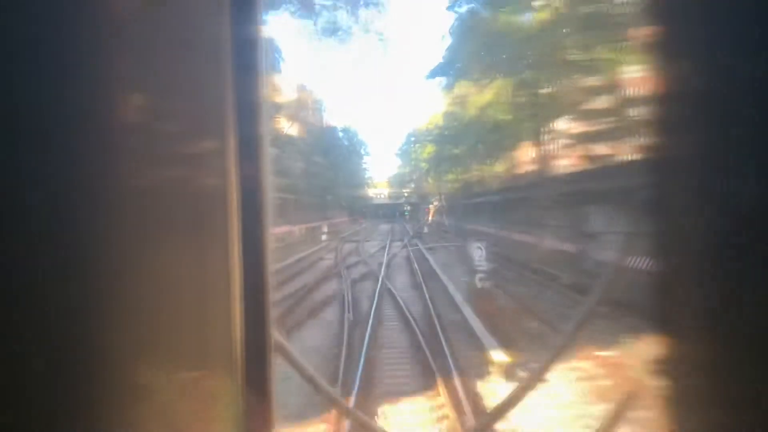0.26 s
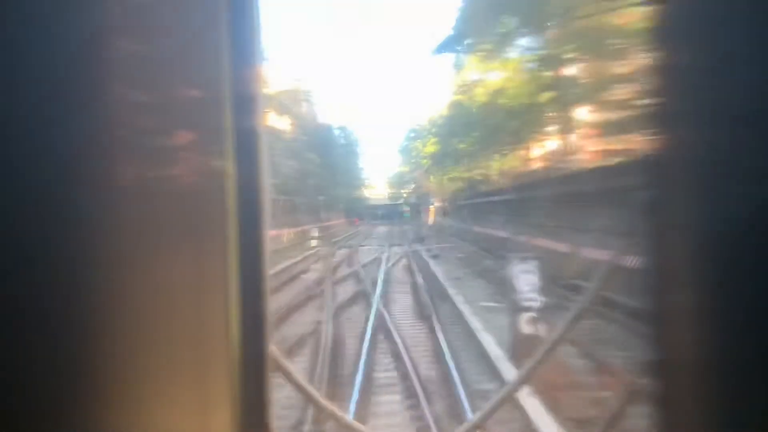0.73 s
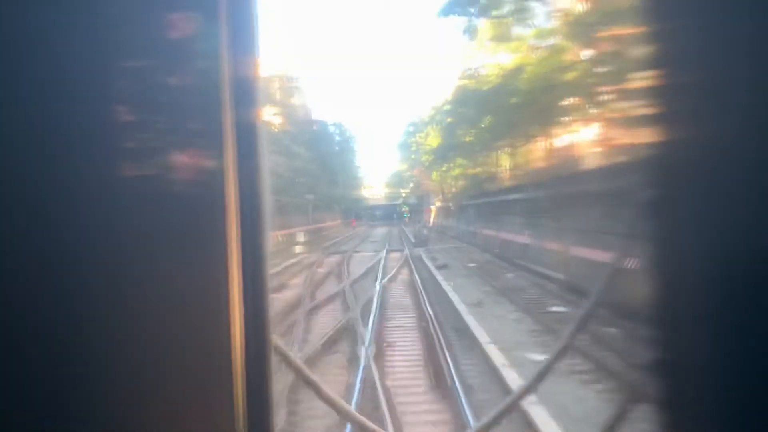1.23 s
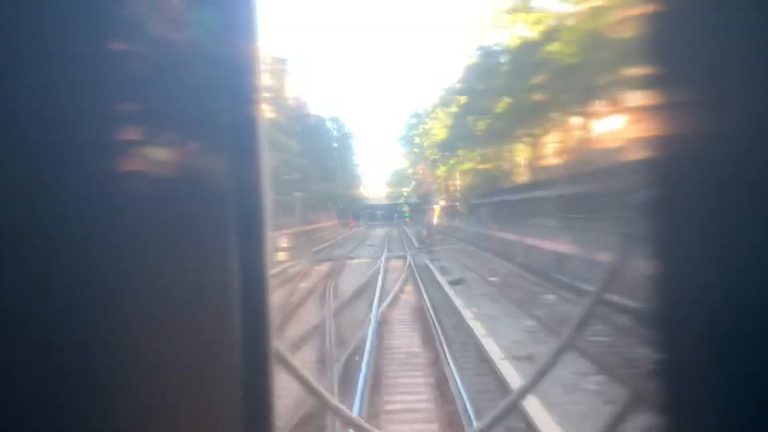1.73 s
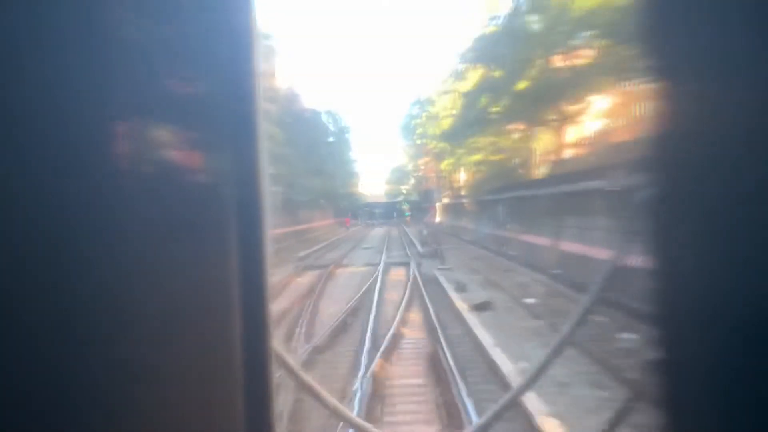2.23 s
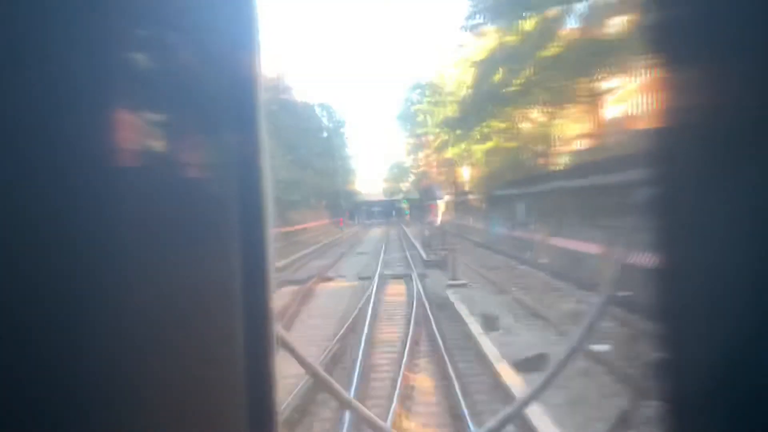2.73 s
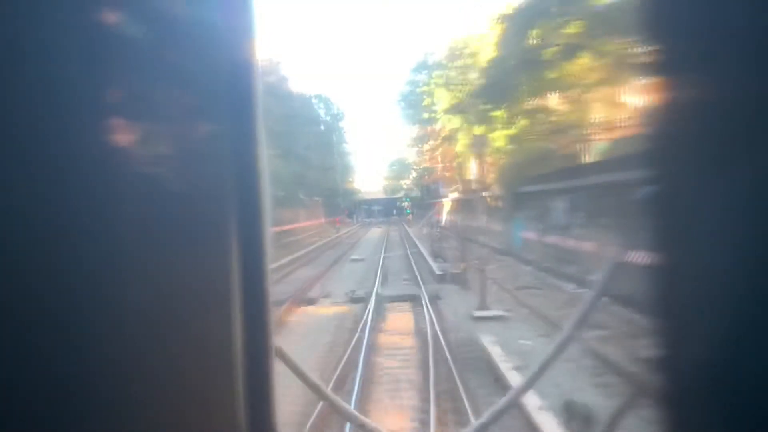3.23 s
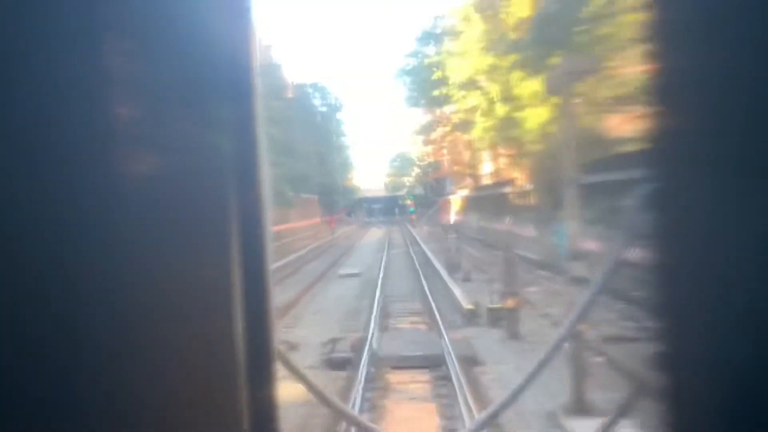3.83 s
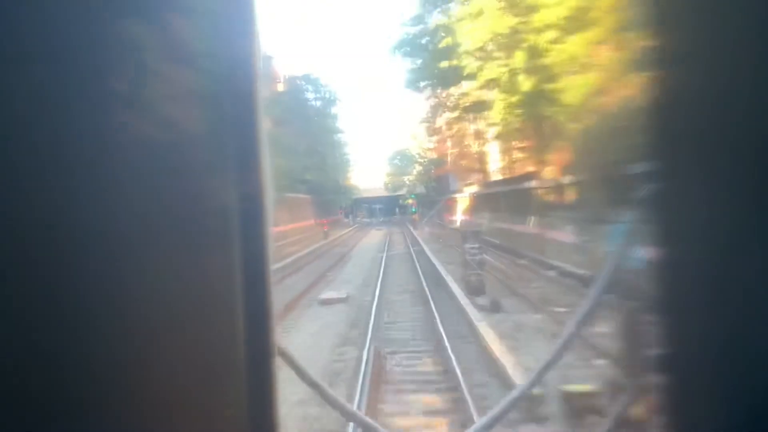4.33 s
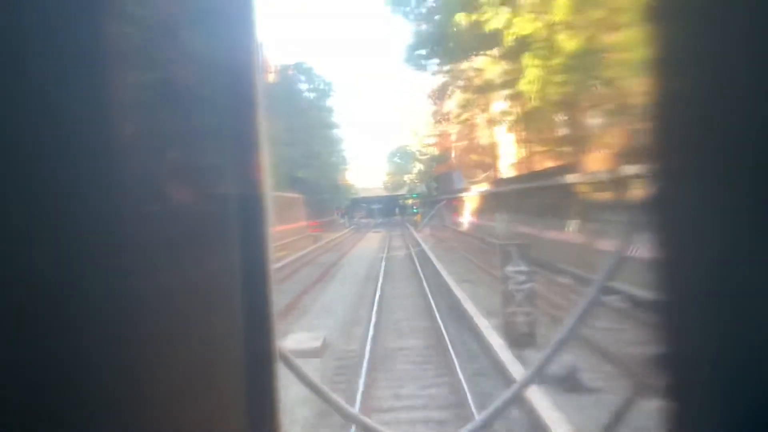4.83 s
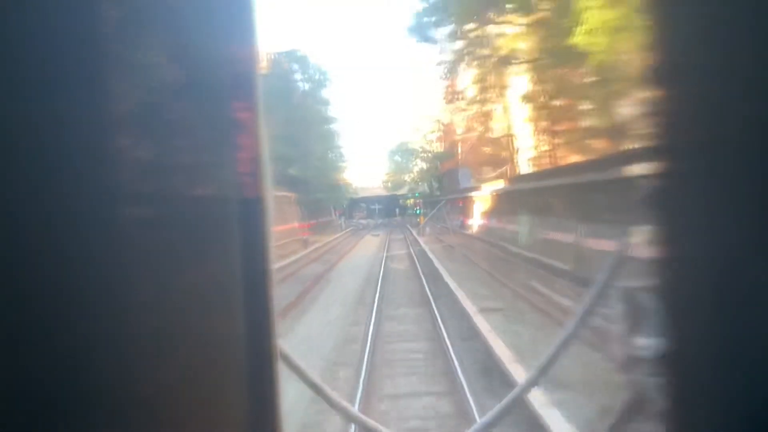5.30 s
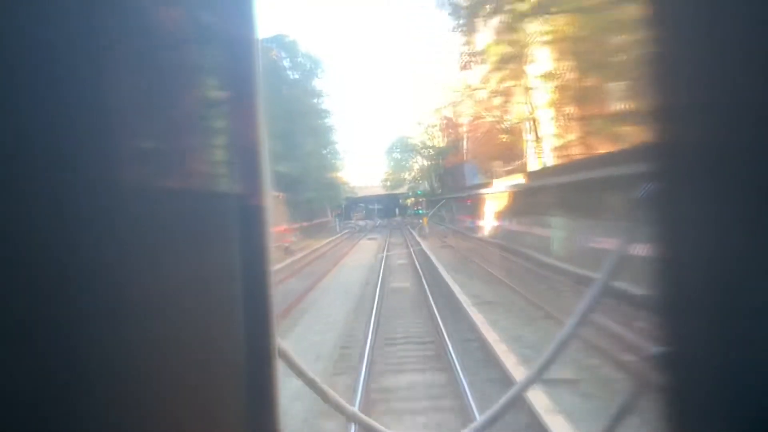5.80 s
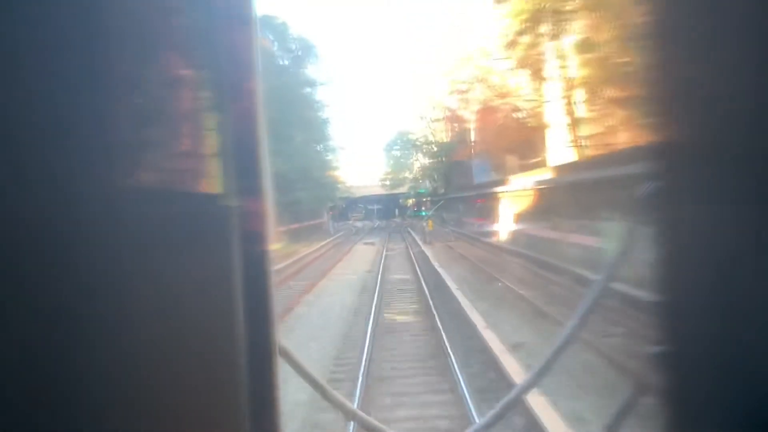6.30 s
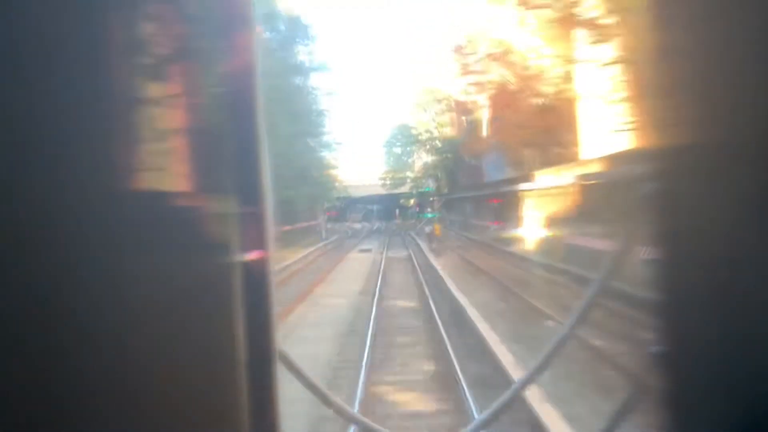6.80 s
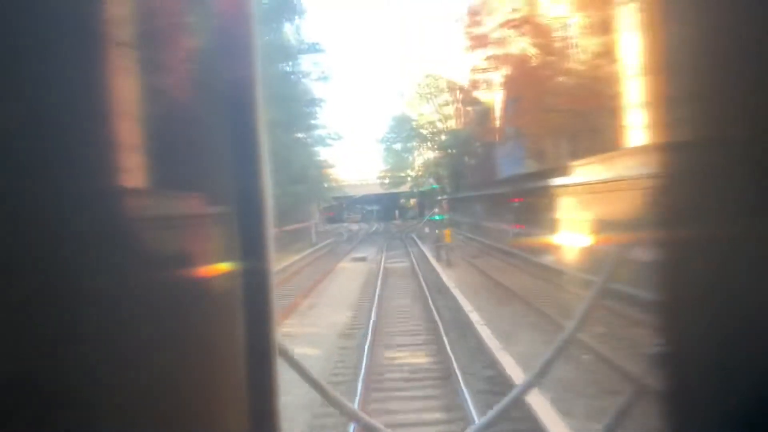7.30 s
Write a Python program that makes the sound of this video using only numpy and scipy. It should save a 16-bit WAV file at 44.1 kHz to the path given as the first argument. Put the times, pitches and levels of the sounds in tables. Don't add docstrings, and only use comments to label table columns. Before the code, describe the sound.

A train runs at speed on open track, heard from within the enclosed car. Continuous bassy rumble dominates, wavering with jolts, under a gritty rail roar and very faint high electrical whine. Metallic clacks and short flange scrapes cluster early over switches, with close dry knocks of loose trim and a sharp latch click. Later only scattered dull bumps, faint squeaks and a last knock. Wide, close stereo pickup.

```python
import sys
import numpy as np
from scipy import signal
from scipy.fft import rfft, irfft, next_fast_len
from scipy.io import wavfile
from scipy.ndimage import uniform_filter1d

SR = 44100
rng = np.random.default_rng(int(sys.argv[2]) if len(sys.argv) > 2 else 0)


def to_wav(s):
    ch = np.atleast_2d(s).T
    pcm = np.round(np.clip(ch, -1, 1) * 32767)
    wavfile.write(sys.argv[1], SR, pcm.astype(np.int16))


def gain_from_db(level_db):
    decades = np.asarray(level_db, float) / 20
    return 10 ** decades


N = 332955
T = np.arange(N) / SR
SIZE = next_fast_len(N)
HZ = np.maximum(np.fft.rfftfreq(SIZE, 1 / SR), 1)
SIDES = np.array([[1], [-1]])

# frequency in Hz, left-right likeness from -1 to 1.
LIKENESS = [(60, .87), (180, .9), (330, .76), (510, 0), (700, -.25), (900, .15), (1050, 0), (1400, -.45),
            (1700, .2), (2200, .22), (2800, -.22), (3300, .15), (4500, .15), (6000, .05)]
# frequency in Hz, left minus right in dB.
LEAN_DB = [(60, 3), (92, 1), (140, 0.5), (220, 0.5), (330, 2.5), (500, 2.5), (770, 3), (1180, 0), (1810, 1),
           (2770, 0.5)]
# time in seconds, level in dB.
TRACK_DB = [(0, 1), (.6, 0), (1.0, -1.5), (1.45, 0), (1.75, 0), (2.0, 0.5), (2.25, 3.5), (2.65, 1),
            (3.0, 0), (3.7, 1.5), (4.1, -1.5), (4.7, 0), (5.4, -1.5), (5.9, -2), (6.1, -.5), (6.9, -1.5),
            (7.2, -2), (7.55, 0.5)]
# time in
# seconds, frequency in Hz, swell in dB, length in seconds.
JOLTS = [(0.078, 322, 6, 0.05), (.3, 79.5, 7, 0.29), (0.667, 350, 9, 0.072), (0.685, 65.4, 8, .2),
         (1.2, 330, 0.5, .15), (1.357, 179, -1, 0.24), (1.806, 80, 1.5, .3), (1.902, 333, 3, 0.5),
         (2.157, 169, 4, 0.11), (2.317, 109.6, 8, 0.27), (2.5, 316.5, 3, 0.085), (2.952, 175.4, 5, 0.31),
         (3.032, 297, 5, 0.17), (3.3, 119, 7, .3), (3.47, 303, 5.5, .2), (3.574, 850, 0.5, .2),
         (3.76, 372, 3, .2), (4.187, 179.6, 4.5, 0.31), (4.448, 84.8, 5, .4), (4.95, 1880, 2, 0.33),
         (5.297, 81, 2.5, 0.17), (5.691, 180.3, 4.5, 0.15), (5.961, 201, 4, 0.18), (2.559, 547, -3, 0.18),
         (4.499, 280, 1.5, 0.22), (3.28, 200.6, -2, .2), (.85, 282, -2.5, .2), (0.361, 200.5, -3.5, 0.22),
         (1.119, 2200, 2, .2), (3.0, 2210, 3, 0.17), (1.371, 150, 4, .15), (4.75, 70.3, 5.5, .15),
         (3.899, 99.6, 5, 0.22), (.7, 850, 4, .3), (6.107, 80, 2.5, 0.19), (6.2, 900, 3, .4),
         (6.457, 70, 2.5, .15), (6.692, 171.5, 5.5, .15), (6.8, 307, 2.5, .2), (7.034, 85, 4, .25),
         (7.467, 350, 1.5, 0.12)]

# frequency in Hz, density in dB per Hz.
BODY_TONE = [(12, -57), (20, -27), (30, -17), (40, -6), (69, -3.5), (135, -6), (177, -1), (232, -6.5),
             (290, -4.5), (352, -7.5), (433, -10.5), (476, -11), (558, -16), (900, -26), (1170, -57.5),
             (1980, -120)]
# frequency in Hz, width in Hz, height in dB.
BODY_MODES = [(86.7, 15, 4), (183, 31, 1), (297.5, 9.7, 6), (360.7, 24, 4.5), (474.4, 18, 2), (613, 44, 3)]
# frequency in Hz, density in dB per Hz.
ROLL_TONE = [(500, 1.5), (630, -4.5), (800, -8), (1000, -13.5), (1300, -12), (1600, -15), (1950, -18),
             (2500, -23), (3200, -32), (4000, -38), (5000, -40.5), (6600, -45.5), (7500, -53.5),
             (8300, -59)]
# frequency in Hz, width in Hz, height in dB.
WHEEL_MODES = [(972, 140, 5), (1893, 130, 6.5), (2038, 89, 5), (3480, 41, -1), (3890, 34, 8),
               (4250, 38, 2.5), (4520, 46, 2.5), (4670, 31, 3), (5150, 36, 0.5), (5500, 25, 0)]

# time in seconds, carrier in dB, upper minus lower sideband in dB.
WHINE_DB = [(0, -63, 8), (.28, -53, -8), (.5, -64, 0), (.72, -54, -12), (1.3, -63, -10), (1.7, -52, -18),
            (2.7, -52, -10), (2.86, -66, 0), (2.97, -57, 10), (3.45, -60, 16), (4.3, -54, -14),
            (4.6, -66, 5), (4.78, -58, 12), (5.25, -52, 12), (5.8, -58, 3), (6.05, -76, 8), (6.7, -59, -12),
            (7.55, -60, -10)]
# frequency in Hz, width in #
# Hz, level in dB, flicker in dB.
HISS_BANDS = [(8569.6, 5, -86, 2), (9900, 400, -104, 8), (10850, 150, -81, .5), (11200, 150, -80, .5),
              (14800, 400, -112, 8)]

# start in seconds, level in dB, ring t60 in seconds, brightness in dB an octave.
CLANKS = [(.272, -45, 0.1, -6), (0.6476, -20.5, 0.17, 2.5), (0.691, -42.5, .2, 5),
          (.975, -28.5, 0.18, -5.5), (1.384, -26, .26, 4), (1.43, -46, 0.15, -3.5), (2.02, -39.5, .15, 2),
          (2.207, -27.5, 0.18, 0.5), (2.229, -27, 0.17, 3), (2.339, -34, 0.2, -4.5),
          (3.258, -42.5, .06, -10), (4.19, -45, 0.09, 9.5), (5.07, -36.5, 0.13, -7), (5.81, -40.5, .1, 3),
          (5.841, -37.5, 0.057, -8.5), (6.45, -45, 0.098, 2), (7.061, -46, .05, -7),
          (7.199, -31.5, 0.078, 1.5)]
# middle in seconds, level in dB, length in seconds, brightness in dB an octave.
SCRAPES = [(0.448, -36.5, 0.33, -2), (1.063, -30.5, 0.099, -6), (1.138, -39, 0.14, -1.5),
           (1.212, -40, 0.18, -2), (1.697, -33.5, 0.31, -6.5), (2.583, -34.5, 0.17, 0),
           (2.944, -31, 0.16, -4.5), (3.067, -31.5, 0.23, -3), (4.946, -40.5, 0.18, -1),
           (6.074, -41, .16, -0.5), (6.583, -41.5, 0.22, -7)]
# frequency in Hz, density in dB per Hz.
STEEL_TONE = [(700, 2), (1200, -6), (1800, 1.5), (2500, -8), (3200, -15.5), (4500, -17.5), (6500, -22.5),
              (8000, -37), (10000, -55.5), (12500, -67), (14000, -88)]
# frequency in Hz, width in Hz, height in dB.
STEEL_MODES = [(1380, 60, 4), (1880, 31, 2.5), (2254, 25, 8), (2330, 24, 12), (3150, 54, -0.5),
               (3260, 45, 10), (3900, 49, 7.5), (4520, 60, 4.5), (4800, 80, 1)]
# start in seconds, frequency in Hz, peak in dB,
# t60 in seconds, half of left's lead over right in turns.
RINGS = [(.648, 850, -25, .09, .1), (.65, 1870, -25, .08, .1), (.655, 2500, -29, .09, -.1),
         (.657, 1500, -29, .07, .15), (.657, 3450, -34, .08, 0.), (.669, 1860, -24, .06, .1),
         (.679, 1880, -27, .08, -.1), (.976, 2300, -34, .06, .1), (1.06, 1800, -33, .15, .1),
         (1.186, 2280, -33, .08, .1), (1.389, 1930, -32, .15, .1), (1.395, 2200, -28, .12, -.1),
         (1.4, 1680, -30, .12, .1), (1.402, 1950, -29, .1, .1), (1.408, 2270, -29, .12, 0.),
         (1.395, 3400, -37, .15, .1), (1.397, 5100, -40, .15, .1), (1.425, 1850, -32, .1, .1),
         (1.474, 900, -28, .08, .1), (2.211, 1850, -31, .06, .1), (2.213, 2150, -33, .12, -.1),
         (2.213, 3500, -39, .07, .1), (2.21, 4500, -39, .07, .1), (2.234, 2470, -31, .1, .1),
         (2.236, 1590, -31, .12, .1), (2.238, 2050, -28, .1, -.1), (2.238, 3520, -34, .05, .1),
         (2.239, 3960, -37, .06, .1), (2.349, 1900, -31, .08, .1), (2.354, 1560, -32, .1, .1),
         (2.947, 2000, -32, .06, .1), (2.968, 2200, -33, .06, .1), (3.117, 1950, -32, .07, .1),
         (3.257, 590, -20, .035, .03), (5.069, 665, -18, .035, .03), (5.84, 600, -20, .035, .03),
         (7.061, 600, -22, .035, .03), (.65, 520, -23, .1, .03)]

# start in seconds, peak in dB, left lag behind right in ms,
# left minus right in dB, brightness in dB an octave.
GRIT_TICKS = [(.35, -72, 0., 0., .1), (1.0065, -66, 0., 0., .1), (1.112, -69, 0., 0., .1),
              (1.131, -65, 0., 0., .1), (2.109, -61, 0., 0., .1), (3.41, -72, 0., 0., .1),
              (4.269, -70, 0., 0., .1), (4.2985, -63, 0., 0., .1), (4.758, -73, 0., 0., .1),
              (4.7685, -64, 0., 0., .1), (5.984, -65, 0., 0., .1), (6.8437, -75, 0., 0., .1)]
TRIM_TICKS = [
    (0.671, -26.5, .3, -4, 0.5),
    (0.8404, -54, 0.013, 9, 12),
    (1.1487, -55.5, 0.27, 2.5, 6.5),
    (2.3194, -23.5, .35, -5.5, 0.9),
]
LATCH_TICKS = [
    (3.0867, -18.5, .3, 1.7, .6),
]
PANEL_TICKS = [
    (7.1127, -24, -.2, 6, -.5),
]
# frequency in Hz, t60 in seconds, level in dB.
GLASS_MODES = [(12900, .004, -10), (13700, .004, -6), (14600, .004, -6), (15400, .004, -7)]
TRIM_MODES = [(2300, 0.0054, -4.5), (3900, .005, -10.5), (4800, 0.0063, 1), (6240, .006, -1.5),
              (7500, .003, -9.5), (8900, 0.0036, -13), (11300, 0.0044, -10.5), (12200, .004, -9),
              (14500, .0025, -21), (15400, .0025, -17.5)]
LATCH_MODES = [(3330, 0.0055, -1), (4150, .006, -2.5), (5300, .004, -7), (6600, 0.0055, -3.5),
               (8000, 0.005, -8), (9600, 0.0042, -7.5), (11500, .004, -3.5), (12600, .004, -7),
               (14000, .003, -12.5), (15000, .003, -11)]
PANEL_MODES = [(2300, .007, 0.5), (3100, 0.007, 1), (4200, 0.0043, -9.5), (6440, 0.0043, -10),
               (8200, .003, -18), (10400, 0.0044, -11.5), (12300, .003, -16), (14300, .003, -13),
               (15400, .003, -7.5)]

# start in seconds, length in seconds, frequency in Hz, level in dB.
SQUEAKS = [(1.05, .04, 1830, -36), (1.06, .04, 4250, -52), (1.08, .03, 3400, -48), (1.11, .055, 4350, -51),
           (1.112, .035, 3150, -47), (1.68, .07, 1390, -38), (2.92, .045, 3780, -52),
           (2.93, .03, 4200, -55), (6.04, .05, 4550, -58), (6.065, .04, 5060, -58), (6.085, .05, 4850, -58),
           (6.39, .04, 4190, -48), (6.43, .04, 4150, -58), (6.395, .04, 3930, -56), (6.53, .115, 4348, -48),
           (6.21, .04, 4150, -59), (6.21, .04, 4420, -60), (6.075, .03, 3620, -54), (6.55, .09, 4080, -60)]
# start in seconds, end in seconds, lower edge in Hz.
STARVED = [(.19, .24, 6900), (.33, .38, 6500), (1.58, 2.0, 6130), (2.67, 2.76, 6250), (3.72, 3.9, 6200),
           (4.27, 4.3, 6500), (4.84, 4.87, 6600), (5.07, 5.5, 6130), (5.56, 5.77, 6130), (7.32, 7.4, 6300)]


def table(rows, hz):
    return np.interp(np.log(hz), np.log(np.array(rows)[:, 0]), np.array(rows)[:, 1])


def curves(rows):
    time_s, *columns = np.transpose(rows)
    return np.array([np.interp(T, time_s, column) for column in columns])


def walk(rate_hz):
    hold = int(SR / rate_hz)
    steps = np.repeat(rng.standard_normal(N // hold + 1), hold)
    return 1.5 * uniform_filter1d(uniform_filter1d(steps, hold), hold)[:N]


def colour(tone, modes):
    peaks_db = sum(db / (1 + (2 * (HZ - hz) / width_hz) ** 2) for hz, width_hz, db in modes)
    return gain_from_db(table(tone, HZ) + peaks_db)


def diffuse():
    mid, side = rfft(rng.standard_normal((2, SIZE)))
    alike = np.clip(table(LIKENESS, HZ), -.99, .99)
    ports = np.sqrt(1 + alike) * mid + SIDES * np.sqrt(1 - alike) * side
    return ports * gain_from_db(SIDES * table(LEAN_DB, HZ) / 2)


def band_of(spectrum, place, k):
    return irfft(spectrum * np.cos(np.pi / 2 * np.clip(place - k, -1, 1)) ** 2, SIZE)[:, :N]


def jolts(hz):
    db = np.zeros(N)
    for when_s, at_hz, swell_db, length_s in JOLTS:
        span = slice(max(int((when_s - length_s) * SR), 0), int((when_s + length_s) * SR))
        near = np.exp(-(np.log2(hz / at_hz) / 0.52) ** 2)
        if near > .01:
            db[span] += swell_db * near * np.cos(np.pi / 2 * (T[span] - when_s) / length_s) ** 2
    return db


def rumble(gain, span_hz, follow, trim_db, shared_db, flicker_db, rate_hz):
    spectrum, shake, out = diffuse() * gain, walk(rate_hz), 0
    common_db = follow * curves(TRACK_DB)[0] + shared_db * shake
    first, last = (int(2 * np.log2(hz / 20)) for hz in span_hz)
    place = np.clip(2 * np.log2(HZ / 20), first, last)
    for k in range(first, last + 1):
        level_db = common_db + jolts(20 * 2 ** (k / 2)) + flicker_db * walk(2 * rate_hz)
        out = out + band_of(spectrum, place, k) * gain_from_db(level_db)
    return out * gain_from_db(trim_db) / out.std()


def body():
    gain = colour(BODY_TONE, BODY_MODES) / (1 + (HZ / 750) ** 8) / (1 + (30 / HZ) ** 6)
    return rumble(gain, (35, 700), follow=0.81, trim_db=-12.5, shared_db=0.37, flicker_db=.5, rate_hz=9)


def rolling():
    gain = colour(ROLL_TONE, WHEEL_MODES) / (1 + (600 / HZ) ** 8) / (1 + (HZ / 8300) ** 40)
    return rumble(gain, (500, 6000), follow=1.0, trim_db=-28, shared_db=0.66, flicker_db=1.24, rate_hz=9)


def pings(count, level_db, spread_db, length_s):
    out, rough_db = np.zeros((2, N)), curves(TRACK_DB)[0]
    for when, pitch, size, stretch, turn, pan in rng.random((count, 6)):
        hz = 500 * 11 ** pitch
        t = T[:int(length_s * (.5 + stretch) * SR)]
        start = int(when * (N - len(t)))
        db = level_db + table(ROLL_TONE, hz) + rough_db[start] - rough_db.mean()
        db = db - spread_db * np.log(0.05 + size)
        swell = np.sin(np.pi * np.sqrt(t / t[-1])) ** 2
        tone = np.sin(2 * np.pi * (hz * t + SIDES * turn))
        out[:, start:start + len(t)] += gain_from_db(db + SIDES * 1.9 * (pan - .5)) * swell * tone
    return out


def whine():
    carrier_hz, sideband_hz, sideband_db, pan_db = 5859.2, 146.1, -70, -2
    carrier_db, lean_db = curves(WHINE_DB)
    out = 0
    for k in (-1, 0, 1):
        db = sideband_db - np.maximum(-k * lean_db, 0) + 2.1 * walk(2.6) if k else carrier_db
        turn_rad = SIDES * (.2 * walk(1.5) - .3) + .15 * walk(12)
        tone = np.sin(2 * np.pi * (carrier_hz + k * sideband_hz) * T + turn_rad)
        out = out + gain_from_db(db + 4 + .8 * walk(15)) * tone
    return out * gain_from_db(SIDES * (pan_db + 1.1 * walk(1.6)) / 2)


def faint_hiss():
    out, spectrum = 0, diffuse()
    for hz, width_hz, db, flicker_db in HISS_BANDS:
        band = irfft(spectrum * np.exp(-((HZ - hz) / width_hz) ** 2), SIZE)[:, :N]
        out = out + band * gain_from_db(db + flicker_db * walk(20)) / band.std()
    return out


def rattling_steel():
    spectrum = diffuse() * colour(STEEL_TONE, STEEL_MODES) / (1 + (800 / HZ) ** 4)
    octave = np.clip(np.log2(HZ / 2000), -1, 2)
    bands = [band_of(spectrum, octave, k) for k in range(-1, 3)]
    rattle = gain_from_db(0.95 * walk(200) + 3.3 * np.array([walk(140) for band in bands]))
    return bands / sum(bands).std(), rattle


def clanks(bands, rattle):
    out = np.zeros((2, N))
    for start_s, db, t60_s, bright_db in CLANKS:
        rise_s = .003 + 0.015 * (t60_s / 0.14) ** 1.5 * gain_from_db(-0.63 * (db + 42.5))
        span = slice(int(start_s * SR), int((start_s + rise_s + t60_s) * SR))
        t = T[span] - start_s
        for k, band in enumerate(bands, -1):
            decay_db = 60 * np.maximum(t - rise_s, 0) / t60_s * 1.04 ** k
            shape = np.clip(t / rise_s, 0, 1) * gain_from_db(db + bright_db * k - decay_db)
            out[:, span] += band[:, span] * shape * rattle[k + 1, span]
    return out


def scrapes(bands, rattle):
    out = np.zeros((2, N))
    for middle_s, db, length_s, bright_db in SCRAPES:
        span = slice(int((middle_s - length_s / 2) * SR), int((middle_s + length_s / 2) * SR))
        swell = np.cos(np.pi * (T[span] - middle_s) / length_s)
        for k, band in enumerate(bands, -1):
            out[:, span] += band[:, span] * swell * gain_from_db(db + bright_db * k) * rattle[k + 1, span] ** 0.62
    return out


def ticks(rows, modes):
    rise_s = .0005
    out = np.zeros((2, N))
    phases = rng.uniform(0, 2 * np.pi, (len(rows), len(modes)))
    for (start_s, db, lag_ms, pan_db, bright_db), row_phases in zip(rows, phases):
        span = slice(int((start_s - .002) * SR), int((start_s + .03) * SR))
        t = np.maximum(T[span] - start_s - SIDES * lag_ms / 2000, 0)
        for (hz, t60_s, mode_db), phase in zip(modes, row_phases):
            peak_db = db + 3 + mode_db + bright_db * np.log2(hz / 6500) + SIDES * pan_db / 2
            shape = gain_from_db(peak_db - 60 * t / t60_s) * np.minimum(t / rise_s, 1)
            out[:, span] += shape * np.sin(2 * np.pi * hz * t + phase)
    return out


def rings():
    rise_s, gain_db = .0015, 4.5
    out = np.zeros((2, N))
    for start_s, hz, db, t60_s, turns in RINGS:
        span = slice(int(start_s * SR), int((start_s + t60_s) * SR))
        t = np.maximum(T[span] - start_s, 0)
        shape = gain_from_db(db + gain_db - 60 * t / t60_s) * (1 - np.exp(-t / rise_s))
        out[:, span] += shape * np.sin(2 * np.pi * (hz * t + SIDES * turns))
    return out


def squeaks():
    out = np.zeros((2, N))
    waver_turns = np.cumsum(11 * walk(80)) / SR
    rough = gain_from_db(2.5 * walk(250))
    for start_s, length_s, hz, db in SQUEAKS:
        span = slice(int(start_s * SR), int((start_s + length_s) * SR))
        swell = np.sin(np.pi * np.clip((T[span] - start_s) / length_s, 0, 1)) ** 0.39 * rough[span]
        tone = np.sin(2 * np.pi * (hz * T[span] + waver_turns[span]) + 0.22 * SIDES)
        out[:, span] += gain_from_db(db) * swell * tone
    return out


def scene():
    bands, rattle = rattling_steel()
    wheels = rolling() + pings(count=1000, level_db=-26.5, spread_db=2.0, length_s=.07)
    wheels = wheels + clanks(bands, rattle) + scrapes(bands, rattle) + rings()
    car = body() + wheels + whine() + faint_hiss()
    fittings = ticks(TRIM_TICKS, TRIM_MODES) + ticks(LATCH_TICKS, LATCH_MODES)
    fittings = fittings + ticks(PANEL_TICKS, PANEL_MODES) + ticks(GRIT_TICKS, GLASS_MODES)
    return car + fittings + squeaks()


def starve(x):
    out = x.copy()
    for start_s, end_s, edge_hz in STARVED:
        span = slice(int(start_s * SR), int(end_s * SR))
        fade = np.clip(np.minimum(T[span] - start_s, end_s - T[span]) / .012, 0, 1)
        faint = signal.ellip(10, .1, 60, (edge_hz, 10000), "bandpass", fs=SR, output="sos")
        out[:, span] -= fade * signal.sosfiltfilt(faint, x[:, span])
    return out


def band_limit(x):
    return signal.sosfilt(signal.butter(12, 15830, fs=SR, output="sos"), x)


def record(dry):
    ceiling = .95
    soft = ceiling * dry / (ceiling ** 4 + dry ** 4) ** .25
    mix = starve(soft)
    return band_limit(mix)


dry = scene()
out = record(dry)
to_wav(out)
```